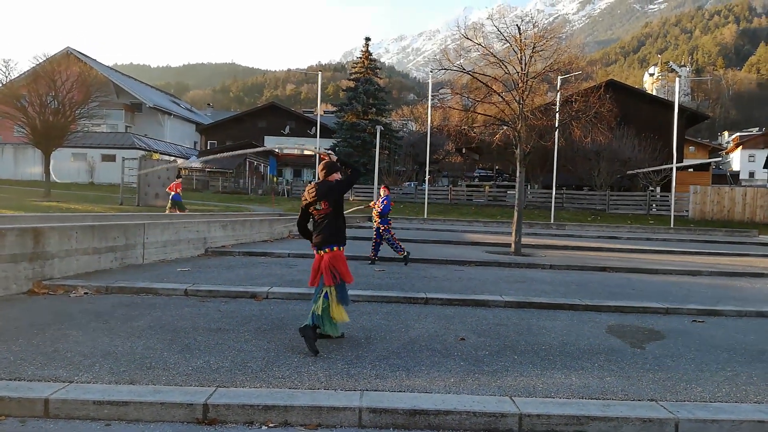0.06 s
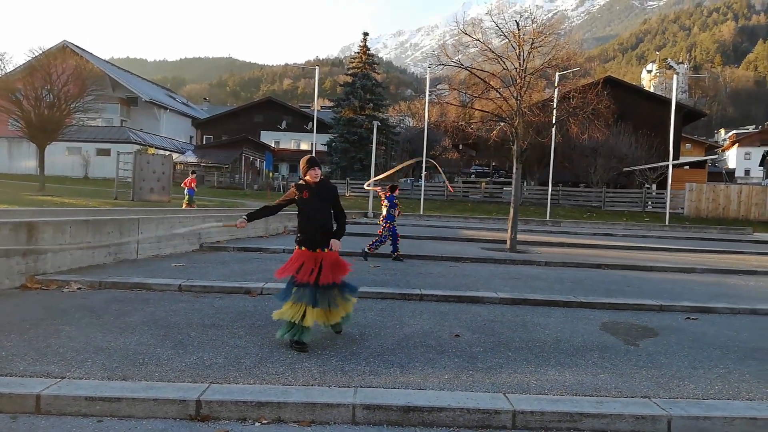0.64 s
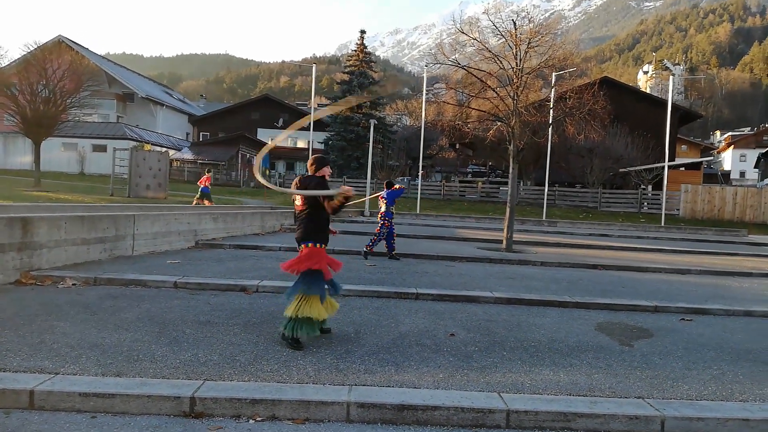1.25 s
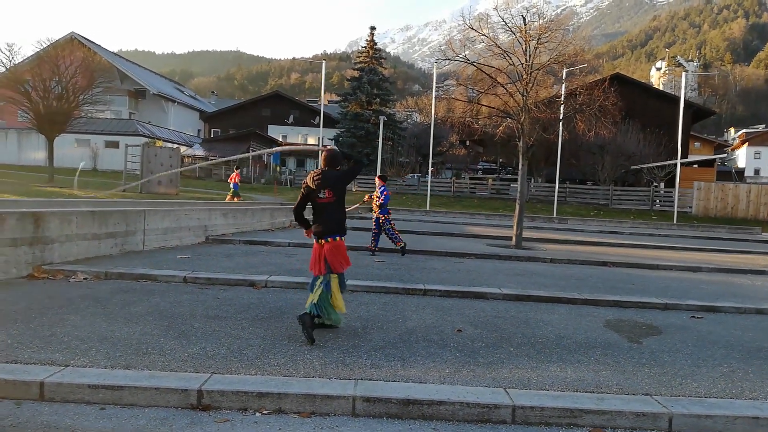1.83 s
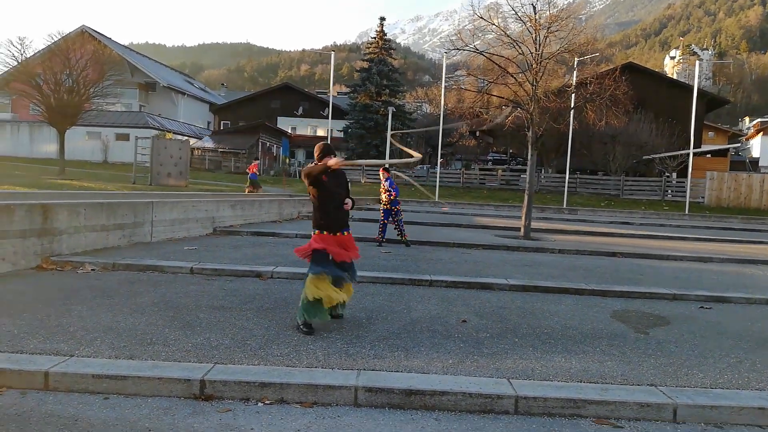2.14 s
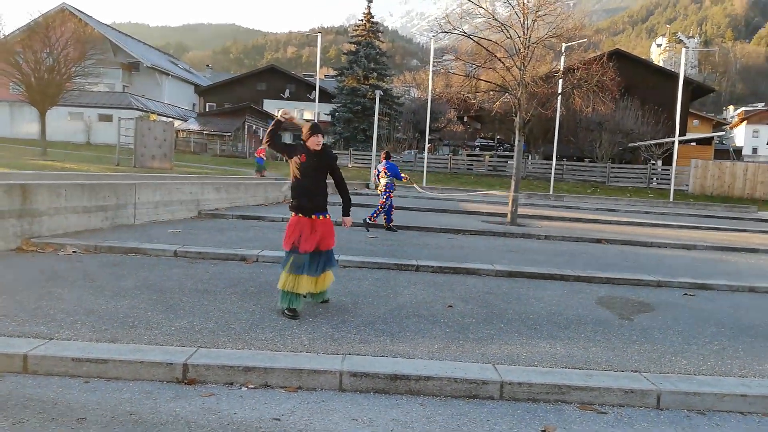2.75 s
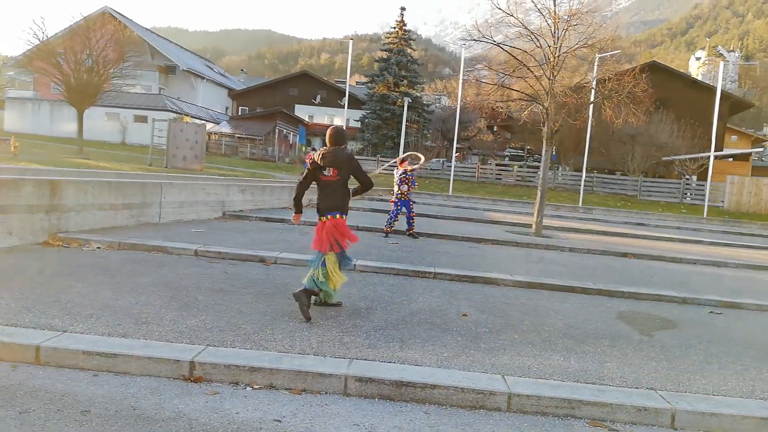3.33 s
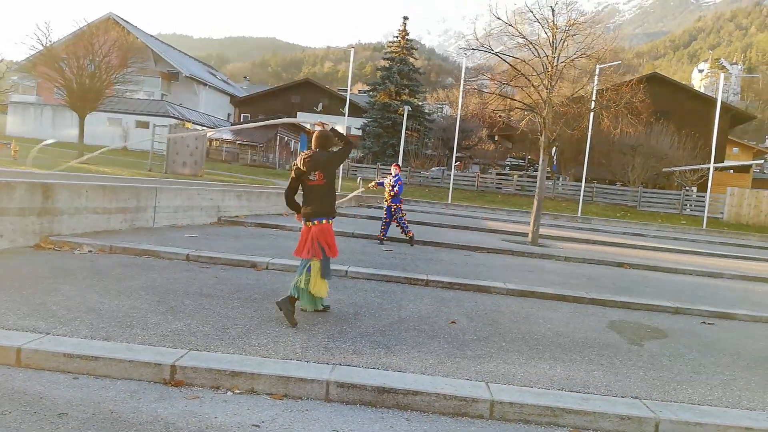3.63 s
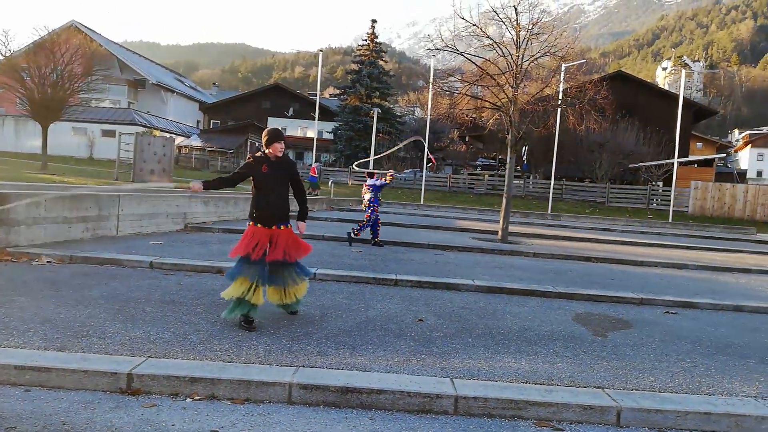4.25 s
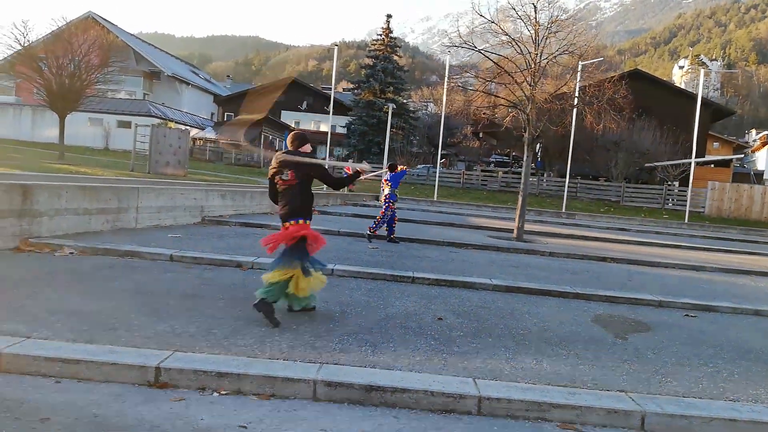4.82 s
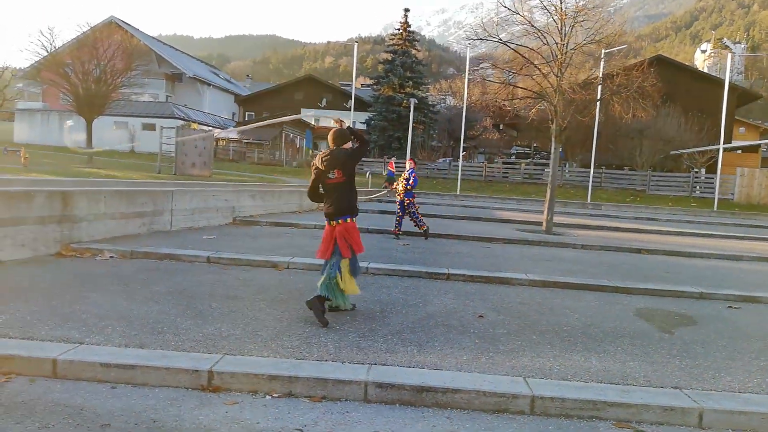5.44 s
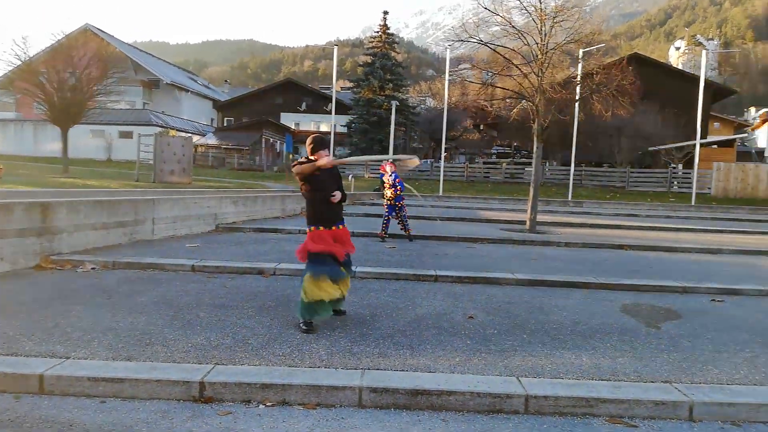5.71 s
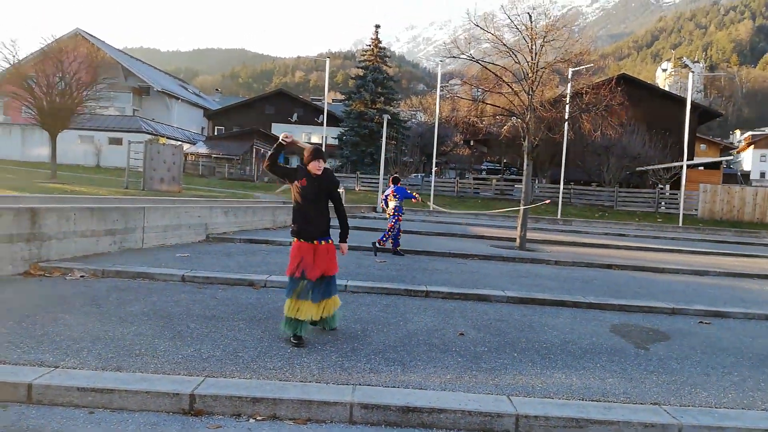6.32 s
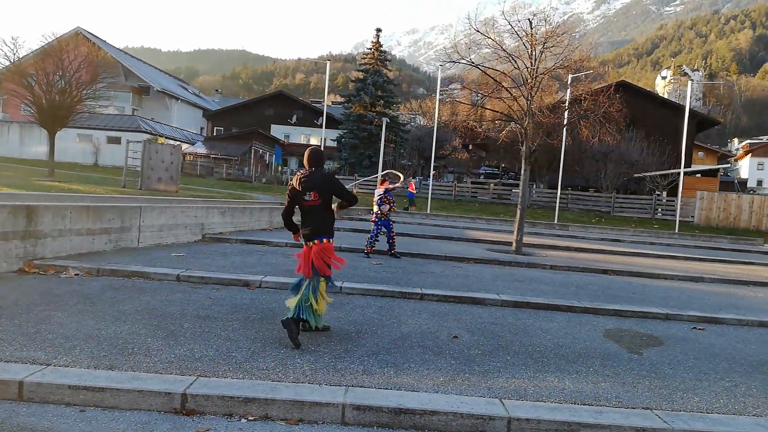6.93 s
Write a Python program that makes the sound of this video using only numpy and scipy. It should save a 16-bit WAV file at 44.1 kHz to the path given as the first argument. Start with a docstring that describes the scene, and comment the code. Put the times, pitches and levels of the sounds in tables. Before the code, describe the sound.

Two long whips crack in turn on a paved village lot for about seven seconds, making a steady rhythm of roughly two cracks a second. The farther whip opens right at the start and returns at about 0.8, 1.7, 2.6, 3.6, 4.4, 5.3 and 6.2 seconds, often with a very quick double snap. The near whip answers at about 0.5, 1.4, 2.2, 3.1, 4.0, 4.9, 5.8 and 6.7 seconds. The cracks are sharp and bright with a low thump, as from an overloaded microphone, heaviest at 2.2 and 5.8 seconds. The lashes hiss faintly beforehand. Each crack slaps back from walls and houses, then rolls away among trees and slopes, growing duller and lingering into the next. Underneath are a soft outdoor hush and the faint low drone of a distant engine, both dipping briefly after every crack.

```python
"""Two long whips crack in turn on a paved village lot, one near and one further off.
Each tip makes a sharp shock wave, with a low thump as from an overloaded microphone. The near whip
swings forehand and backhand; the far one snaps twice in quick succession. Every crack slaps back from
walls and houses, then rolls away among trees and slopes, losing its treble. Behind them are a soft
outdoor hush and the drone of a far-off engine."""
import sys
import numpy as np
from scipy import signal
from scipy.fft import rfft, irfft
from scipy.io import wavfile
from scipy.ndimage import uniform_filter1d

SR = 44100
rng = np.random.default_rng(int(sys.argv[2]) if len(sys.argv) > 2 else 0)


def generate_wav(sig):
    """Save sig (samples, or channels by samples) to the path in sys.argv[1] as 16-bit PCM at SR."""
    pcm = np.round(np.clip(np.atleast_2d(sig).T, -1, 1) * 32767).astype(np.int16)
    wavfile.write(sys.argv[1], SR, pcm)


N = 311787

# Levels in the tables are relative: the functions add their own gains. A "second hit" follows each
# crack: the near whip's first slap off a wall, or the far whip's own second snap.
# One row per crack: (time [s], length [s], body level [dB], treble over body [dB], left over right [dB],
# thump level [dB], rolling echo level [dB], its lift near 3.7 kHz [dB], delay of the second hit [s],
# second hit gain [dB], near walls gain [dB], houses gain [dB])
FOREHAND_CRACKS = [(0.46, 0.0022, -15, 8, 1, -15.5, -23, -2.5, 0.018, 0, -1.1, 0.75),
                   (2.2307, 0.0016, -9, 2, -4, -7.5, -22.5, -2, .0176, 0.5, 0, -0.88),
                   (4.024, 0.0025, -11, 2.5, -2, -20, -23, .4, .0165, -3.5, 0, 1),
                   (5.7811, 0.0018, -2.5, -4, -6, -8, -23, 0, .0173, -1, 0.88, 0.67)]
BACKHAND_CRACKS = [(1.383, 0.0056, -19.5, 7.9, 1.3, -29.5, -25.5, -3.5, 0.017, -0.91, 2, -2.5),
                   (3.135, 0.0064, -18, 4.3, 0.17, -20.5, -24.5, -4.5, 0.019, -1.9, 1, -6),
                   (4.9223, 0.0045, -21.5, 9.9, 2, -30, -21, -8, .0174, 0.54, 3, -14),
                   (6.701, 0.007, -24.5, 9.8, 1.6, -21.5, -25.5, -5.5, .0175, 0.29, -9, -13)]
FAR_CRACKS = [(0.003, 0.0038, -26, 6, 1, -36.5, -21.5, 0.5, 0.00018, -5, 1, 0),
              (0.84, 0.013, -22.5, -11, -6, -31, -20.5, 0.7, .0093, 2.5, -12, -2),
              (1.716, 0.0071, -18.5, -2.5, -4, -28, -21, -2, .0059, -17, 0, -0.5),
              (2.6385, 0.0081, -20, -2.5, -4, -25, -22, 3, 0.0078, -7, 3, -2),
              (3.561, 0.0028, -21, 5.5, 1, -22, -24, 3, 0.0055, -21, 4, -0.5),
              (4.41, 0.0022, -13, -2, 1, -27.5, -22, 1.6, .009, 6, -11, -7),
              (5.279, 0.0019, -23, 15, -3, -46, -23.5, 4.5, 0.0049, -27, -1, -4),
              (6.1958, 0.0044, -24, -2.5, -6, -26, -25.5, 5, 0.0083, -2, -7.5, -4.5)]
# The second hit on top, then the echoes after it: (time after the second hit [s], length [s],
# body level [dB], treble over body [dB], left over right [dB], head start of the left side [s])
FOREHAND_ECHOES = [(0, 0.0031, -10.5, 3.5, -4.5, .0004), (0.0166, 0.00085, -14.5, -1.5, 13, .00037),
                   (0.0217, 0.0045, -20.5, 7, -3, 0.00024), (0.111, 0.0021, -17, -1.5, 1, 0.00056),
                   (.2777, .0018, -12.5, -10.5, -1, .00045), (0.286, .0018, -23, 3, 9, .0002)]
BACKHAND_ECHOES = [(0, 0.0028, -8.5, -9, 0, .0004), (0.0202, 0.002, -19, -5.5, -9, -0.0038),
                   (0.0417, 0.00075, -15.5, -7.5, -2, .00002), (0.1493, 0.0027, -13.5, 1.5, -3.5, -.00016),
                   (.166, .0018, -13.5, -5.5, -2, -.00042), (.287, .0018, -14, -25, -3, .00045)]
FAR_SNAP_AND_ECHOES = [(0, .003, -14, 1, 4, 0.01), (.011, 0.0021, -12.5, 1.5, -0.5, -0.0044),
                       (0.0186, 0.0026, -16.5, -9, -10, -.00002), (0.0419, 0.0021, -17.5, -13, -3, 0),
                       (0.0626, 0.002, -16, -7, -5, .00002), (0.1235, 0.002, -10.5, -3, -2.5, -.00014),
                       (0.1421, 0.003, -12.5, -13.5, -6, -.00045), (0.167, .003, -15.5, -17, -2, .0001),
                       (0.3576, 0.0016, -23.5, -5, 9, -.00018)]
# The tone of a crack, a later hit, the wooded slope and the rolling echo: (frequency [Hz], level [dB])
CRACK_TONE = [(60, 0), (300, 1.5), (450, -2), (650, 2), (1100, 4), (2000, 1), (3500, 1), (5000, 2),
              (7000, -5), (8500, 2), (10000, 5.5), (12000, 0.5), (16000, -16)]
HIT_TONE = [(60, -34), (200, -18.5), (350, -19), (750, -8), (1200, -1.5), (2000, 5.5), (2700, 2), (3500, 5),
            (5000, -2.5), (7000, -5), (10000, -1), (12000, -7.5), (16000, -51)]
SLOPE_TONE = [(60, -40), (500, -15), (850, -16), (1250, 4), (1700, -10), (2400, -9), (5000, -22),
              (16000, -50)]
ROLL_TONE = [(80, -38), (200, -15.5), (350, -21.5), (500, -12), (800, -9), (1300, -6), (2000, -0.5),
             (3100, -4), (4000, -3), (5200, -10), (7000, -14), (10000, -2), (12000, -10), (16000, -22.5)]
# How much the air soaks up as sound travels: (frequency [Hz], loss [dB/s])
AIR_ABSORPTION = [(500, 17), (2000, -2), (4000, 30.5), (7000, 44.5), (10000, 76.5), (15000, 132)]
# How alike left and right are in spread-out noise: (frequency [Hz], likeness [-1 to 1])
STEREO_LIKENESS = [(50, 0.88), (130, 1), (260, 0.93), (500, -0.36), (1000, -0.27), (2000, 0.04),
                   (16000, -0.024)]
# The tone of the outdoor hush: (frequency [Hz], level [dB])
HUSH_TONE = [(25, -7), (70, -17), (120, 1), (250, 0), (450, -9), (1000, 5.5), (2000, 3), (4000, -3),
             (7000, -19.5), (10000, -8.5), (16000, -41)]
# How the far engine swells and fades: (time [s], level [dB])
ENGINE_LEVELS = [(0, -53), (.4, -48), (1.3, -47), (3.101, -44.5), (4, -50.5), (5.3, -55), (6.1, -52),
                 (6.55, -46.5), (7.07, -48)]

BODY_HZ, TREBLE_HZ = 700, 2800  # a crack's body lies between these, its treble above


def cracks(gain_db=1, rush_db=-23):
    """The whip tips outrun sound and crack; the near one has a short rush just before."""
    out = np.zeros((2, N))
    for start, length, db, treble_db, pan_db, *_ in [*FOREHAND_CRACKS, *BACKHAND_CRACKS, *FAR_CRACKS]:
        crack = burst(length, db + gain_db, treble_db, pan_db, CRACK_TONE, same=0.33, fade=0.17, spiky=1)
        add(out, start, crack)
    for start, *_ in [*FOREHAND_CRACKS, *BACKHAND_CRACKS]:
        rush = last_rush(rush_db)
        add(out, start - rush.shape[1] / SR, rush)
    return out


def burst(length, db, treble_db, pan_db, tone, same, fade, spiky, size=2048):
    """A few milliseconds of ragged shock waves; `same` is the share common to both ears."""
    t, hz = np.arange(size) / SR, np.fft.rfftfreq(size, 1 / SR)
    progress = t / max(length, .0005)
    shocks = rng.standard_normal((3, size)) * np.exp(spiky * rng.standard_normal(size))
    shocks *= np.exp(-fade * progress - 3 * np.maximum(progress - 1, 0))
    spectrum = rfft(np.sqrt(same) * shocks[0] + np.sqrt(1 - same) * shocks[1:])
    # shocks hold all frequencies: even them out, then shape the tone
    spectrum /= np.sqrt(uniform_filter1d(abs(spectrum) ** 2, size=70, axis=1))
    spectrum *= quick_filter(amp(curve_at(tone, hz)))
    power = abs(spectrum) ** 2 * 2 / size / (length * SR)
    body = np.sqrt(power[:, (hz > BODY_HZ) & (hz < TREBLE_HZ)].sum(1).mean())
    treble = np.sqrt(power[:, hz >= TREBLE_HZ].sum(1).mean())
    high = 1 / (1 + (TREBLE_HZ / (hz + 1)) ** 8)
    balance = quick_filter((1 - high) / body + high * amp(treble_db) / treble)
    sides = unit(amp(np.array([[pan_db], [-pan_db]]) / 2))
    return irfft(spectrum * balance) * amp(db) * sides


def last_rush(db, rise_s=.0028, size=700):
    """The last hiss of the lash, swelling into the crack."""
    band = signal.butter(2, [900, 11000], "bandpass", fs=SR)
    hiss = signal.lfilter(*band, rng.standard_normal((2, size)))
    return amp(db) * unit(hiss) * np.exp((np.arange(size) - size) / SR / rise_s)


def thumps(even_db=-25, trade=0.68):
    """Low thumps, as from an overloaded microphone, with each crack and the near whip's early slaps."""
    out = np.zeros((2, N))
    for start, _, _, _, _, db, _, _, slap_s, *_ in FOREHAND_CRACKS:
        slap_time = start + slap_s
        add(out, start, thump(db + 4.5, width_s=0.0015, right_lag_s=0.00052))
        add(out, start, thump(db - 1, width_s=0.00043))
        add(out, slap_time, thump(db=-23.5, width_s=0.0084))
        add(out, slap_time, -thump(db=-13, width_s=0.00047, right_lag_s=0.0012))
        add(out, slap_time + FOREHAND_ECHOES[1][0], -thump(db=-27.5, width_s=0.0038))
    for start, _, _, _, _, db, _, _, slap_s, *_ in BACKHAND_CRACKS:
        add(out, start, thump(db + 3, width_s=0.0013))
        add(out, start, thump(db + 10.5, width_s=0.00055))
        add(out, start + 0.00304, thump(db + 5.5, width_s=0.00054))  # the crack bounces off the paving
        slap_thump_db = -21 - trade * (db - even_db)  # louder when the crack's own thump is weak
        add(out, start + slap_s, -thump(slap_thump_db, width_s=0.002, right_lag_s=0.00084))
    for start, _, _, _, _, db, *_ in FAR_CRACKS:
        add(out, start, thump(db + 8, width_s=0.00086))
    return out


def thump(db, width_s, right_lag_s=0, right_stretch=1.15, softness=0.73, size=4096):
    """One low thump: a quick dip, then a slower rise, a little longer on the right."""
    t = np.maximum(np.arange(size) / SR - np.array([[0], [right_lag_s]]), 0)
    progress = t / (width_s * np.array([[1], [right_stretch]]))
    pulse = progress * np.exp(-progress) * (1 - np.exp(-progress / softness))
    wave = -np.gradient(pulse, axis=1)
    return amp(db) * wave / abs(wave).max(1, keepdims=True)


def swish(whip, db, centre_hz, width_hz, lead_s, spread_s, size=256):
    """The lash hisses through the air as it speeds up before each crack."""
    t, hz = frame_grid(size)
    swing = sum(np.exp(-((t - start + lead_s) / spread_s) ** 2) for start, *_ in whip)
    band = np.exp(-((hz - centre_hz) / width_hz) ** 2)
    return spread_noise(amp(db) * swing[:, None] * band / np.linalg.norm(band), size)


def later_hits(whip, hits, gain_db, slope_s, slope_db, houses_after_s=.08, bright_share=0.12):
    """The second hit, echoes off near walls, then houses, and a dull knock from a wooded slope."""
    out = np.zeros((2, N))
    usual_treble_db = np.mean([row[3] for row in whip])
    for start, _, _, crack_treble_db, *_, second_s, second_db, walls_db, houses_db in whip:
        bright_db = bright_share * (crack_treble_db - usual_treble_db)  # brighter crack, brighter hits
        for k, (delay, length, db, treble_db, pan_db, lead_s) in enumerate(hits):
            extra_db = second_db if k == 0 else walls_db if delay < houses_after_s else houses_db
            left, right = burst(length, db + extra_db + gain_db, treble_db + bright_db, pan_db,
                                HIT_TONE, same=0.61, fade=0.87, spiky=0.22)
            lag = round(lead_s * SR)  # one ear hears it first
            hit = np.array([np.roll(left, max(-lag, 0)), np.roll(right, max(lag, 0))])
            add(out, start + second_s + delay, hit)
        knock = burst(length=0.0047, db=slope_db, treble_db=-24, pan_db=-4,
                      tone=SLOPE_TONE, same=0.42, fade=0.1, spiky=0.27)
        add(out, start + second_s + slope_s, knock)
    return out


def rolling_echo(gain_db=-1.4, flicker_db=1.95, patch_db=2.0, right_lean=1.06, size=256):
    """Countless small echoes from trees, roofs and slopes blur into one long roll."""
    t, hz = frame_grid(size)
    tone = amp(curve_at(ROLL_TONE, hz)) ** 2
    tone /= tone[(hz > BODY_HZ) & (hz < TREBLE_HZ)].sum()
    power = tone * (
        scatter(FOREHAND_CRACKS, lot_db=-0.5, hold_s=(0.11, 0.33), hold_db=(0, 0.5), fade_db_s=92)
        + scatter(BACKHAND_CRACKS, lot_db=-3.5, hold_s=(0.11, 0.32), hold_db=(-2.5, 1.45), fade_db_s=153)
        + scatter(FAR_CRACKS, lot_db=-8.5, hold_s=(0.093, 0.33), hold_db=(-6, -4), fade_db_s=108))
    # echoes arrive in clumps, each with its own tone; now and then one stands out as a tick
    flicker = np.minimum(rng.exponential(1, len(t)), 5)[:, None] - 1
    patches = uniform_filter1d(rng.standard_normal(power.shape), size=9, axis=0)
    patches = unit(uniform_filter1d(patches, size=5, axis=1))
    clumps = amp(gain_db + flicker_db * flicker + patch_db * patches)
    # houses on the right return more of the middle range: (frequency [Hz], relative lean [dB])
    lean = curve_at([(400, -0.3), (1100, 1.25), (2200, 2.0), (4000, 0.4), (8000, -4.0), (12000, 1.1)], hz)
    sides = amp(right_lean * np.array([-lean, lean]))[:, None]
    return spread_noise(np.sqrt(power) * sides * clumps, size)


def scatter(whip, lot_db, hold_s, hold_db, fade_db_s, size=256):
    """Echo power: the lot dies away fast, the roll swells, holds and fades, and the valley lingers."""
    lot_peak_s, lot_rise_db_s, lot_fade_db_s = 0.015, 350, 67  # db_s means dB per second
    swell_db_s, valley_db, valley_fade_db_s = 194, -8, 12
    t, hz = frame_grid(size)
    lift = np.exp(-((hz - 3700) / 1100) ** 2)
    power = np.zeros((len(t), len(hz)))
    for start, _, _, _, _, _, db, lift_db, *_ in whip:
        live = (t > start + .004) & (t < start + 1)
        age = t[live, None] - start
        lot = lot_db - lot_fade_db_s * age - lot_rise_db_s * np.maximum(lot_peak_s - age, 0)
        held_roll = np.interp(age, hold_s, hold_db) - swell_db_s * np.maximum(hold_s[0] - age, 0)
        held_roll -= fade_db_s * np.maximum(age - hold_s[1], 0)
        valley = valley_db - valley_fade_db_s * age
        tone = amp(db + lift_db * lift - age * curve_at(AIR_ABSORPTION, hz))  # air dulls late echoes
        power[live] += (amp(lot) ** 2 + amp(held_roll) ** 2 + amp(valley) ** 2) * tone ** 2
    return power


def outdoor_hush(db=-34.5, dip_share=0.16, size=2048):
    """The soft noise of the open air, dipping slightly at each crack."""
    _, hz = frame_grid(size)
    hush = unit(spread_noise(amp(curve_at(HUSH_TONE, hz)), size))
    return amp(db - dip_share * dips()) * hush


def engine(pitch_hz=69.4, waver_hz=1.1, gain_db=1):
    """A far-off engine drones on one low, wavering note that dips at each crack."""
    pitch = pitch_hz + waver_hz * unit(uniform_filter1d(rng.standard_normal(N), size=5000))
    level_db = np.interp(np.arange(N) / SR, *np.transpose(ENGINE_LEVELS))
    return amp(level_db + gain_db - dips()) * unit(np.sin(2 * np.pi * np.cumsum(pitch) / SR))


def dips(near_db=15, far_db=15.5, recovery_db_s=33):
    """The dip in the background: a sudden drop at each crack, then a steady climb back."""
    t = np.arange(N) / SR
    drops = [(start, near_db) for start, *_ in [*FOREHAND_CRACKS, *BACKHAND_CRACKS]]
    drops += [(start, far_db) for start, *_ in FAR_CRACKS]
    depths = [(t > start) * np.maximum(db - recovery_db_s * (t - start), 0) for start, db in drops]
    return np.max(depths, axis=0)


def spread_noise(gain, size):
    """Stereo noise shaped by a gain for each moment and frequency; the ears match most in the bass."""
    t, hz = frame_grid(size)
    a, b, c, d = rng.standard_normal((4, len(t), len(hz)))
    same = curve_at(STEREO_LIKENESS, hz)
    left = a + 1j * b
    right = same * left + np.sqrt(1 - same ** 2) * (c + 1j * d)
    spectra = np.array([left, right]) * gain
    _, noise = signal.istft(spectra.swapaxes(1, 2), nperseg=size, noverlap=size - size // 4)
    return noise[:, :N] * np.sqrt(1.5)


def frame_grid(size):
    """Times and frequencies for short, overlapping slices of sound."""
    hop = size // 4
    return np.arange(N // hop + 5) * hop / SR, np.fft.rfftfreq(size, 1 / SR)


def quick_filter(gain):
    """Spectrum of the quickest filter with this gain, which keeps a sudden start sharp."""
    log_gain = np.log(np.maximum(gain, 1e-4 * gain.max()))
    mirrored = np.concatenate([log_gain, log_gain[-2:0:-1]])
    return np.exp(np.conj(signal.hilbert(mirrored)))[:len(gain)]


def curve_at(points, hz):
    """Look up a (frequency, value) table between its points."""
    point_hz, value = np.transpose(points)
    return np.interp(np.log(hz + 1), np.log(point_hz + 1), value)


def amp(db):
    """Turn decibels into a multiplier."""
    return 10 ** (np.asarray(db) / 20)


def unit(x):
    """Scale to an average power of one."""
    return x / np.sqrt(np.mean(x ** 2) + 1e-20)


def add(mix, start, sound):
    """Mix a sound in at a start time in seconds."""
    part = mix[:, max(round(start * SR), 0):][:, :sound.shape[1]]
    part += sound[:, :part.shape[1]]


def scene():
    """Both whips, their echoes and the background together."""
    lashes = swish(FAR_CRACKS, db=-43, centre_hz=4730, width_hz=880, lead_s=0.044, spread_s=0.095)
    lashes += swish(BACKHAND_CRACKS, db=-46.5, centre_hz=5760, width_hz=3400, lead_s=0.31, spread_s=0.28)
    hits = later_hits(FOREHAND_CRACKS, FOREHAND_ECHOES, gain_db=-1.8, slope_s=.3072, slope_db=-19)
    hits += later_hits(BACKHAND_CRACKS, BACKHAND_ECHOES, gain_db=-0.5, slope_s=.314, slope_db=-21)
    hits += later_hits(FAR_CRACKS, FAR_SNAP_AND_ECHOES, gain_db=-1.45, slope_s=.284, slope_db=-24.5)
    return cracks() + thumps() + lashes + hits + rolling_echo() + outdoor_hush() + engine()


def record(dry, cutoff_hz=16100):
    """The microphone overloads on the highest peaks, then the very top of the treble is cut."""
    squashed = dry / (1 + dry ** 6) ** (1 / 6)
    lowpass = signal.firwin(401, cutoff_hz, window=("kaiser", 8), fs=SR)
    return signal.oaconvolve(squashed, lowpass[None], "same")


dry = scene()
out = record(dry)
generate_wav(out)
```